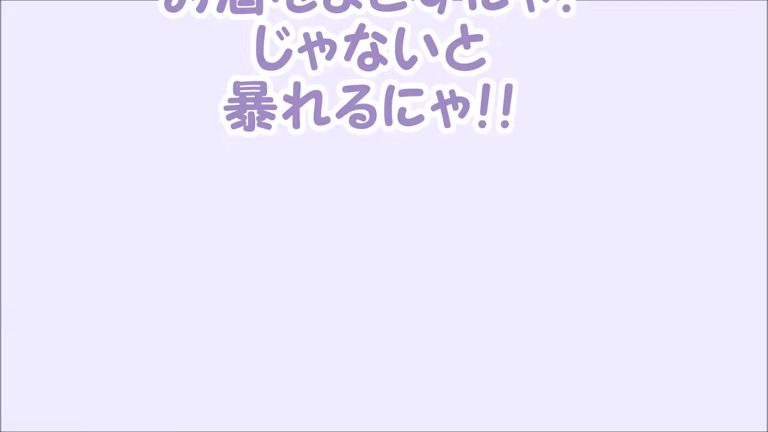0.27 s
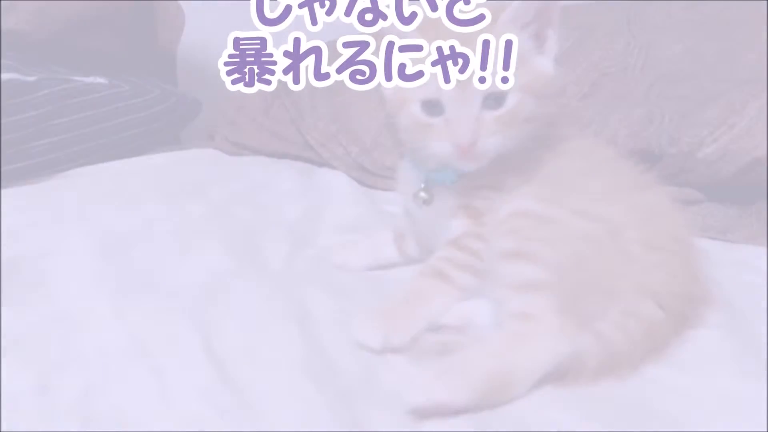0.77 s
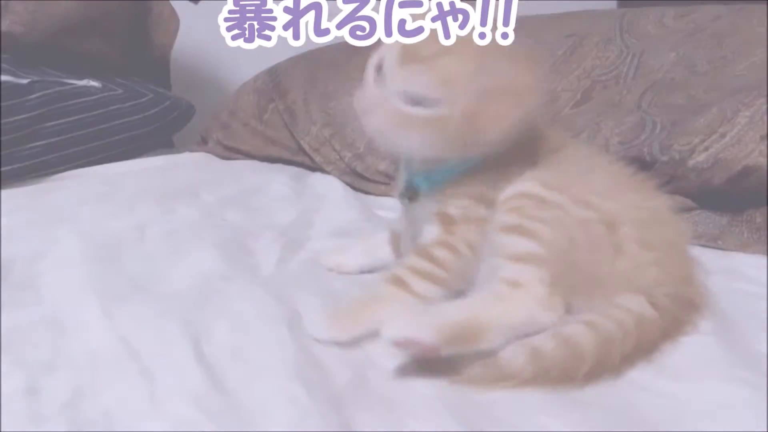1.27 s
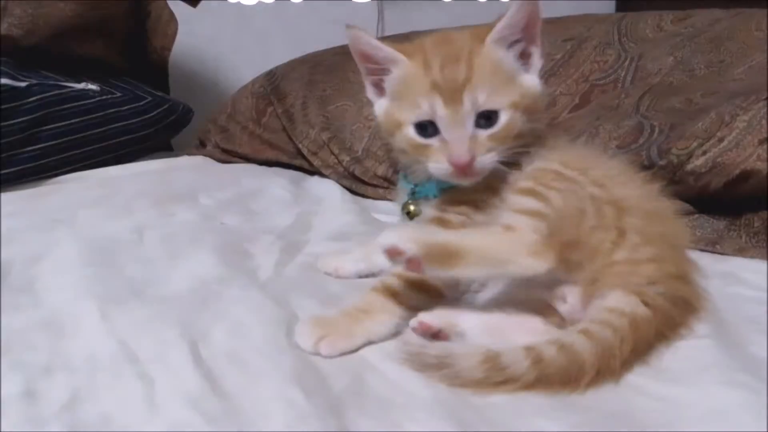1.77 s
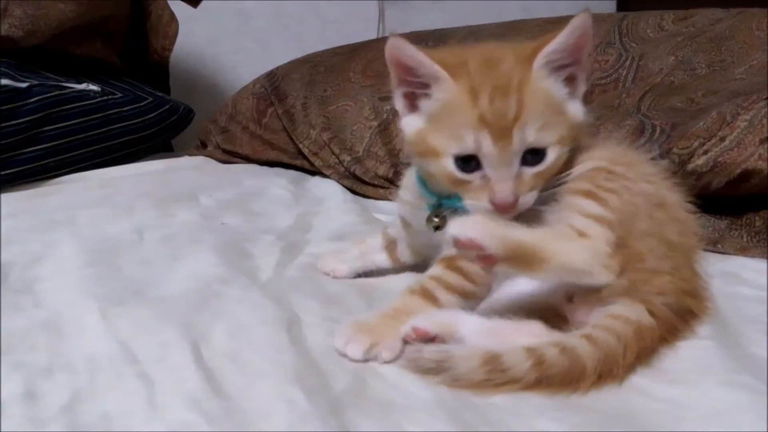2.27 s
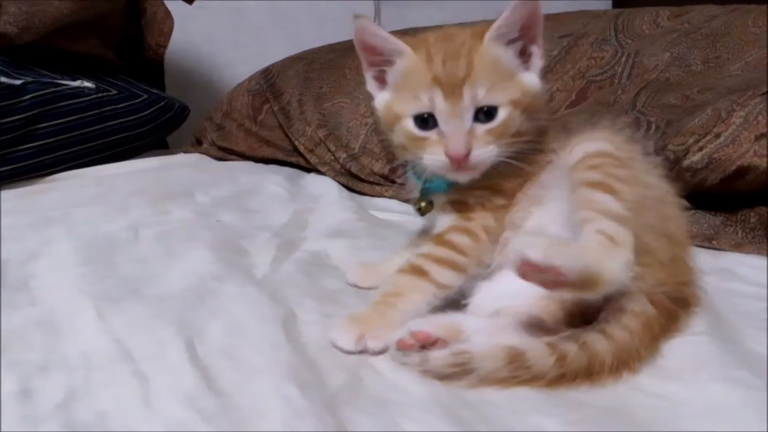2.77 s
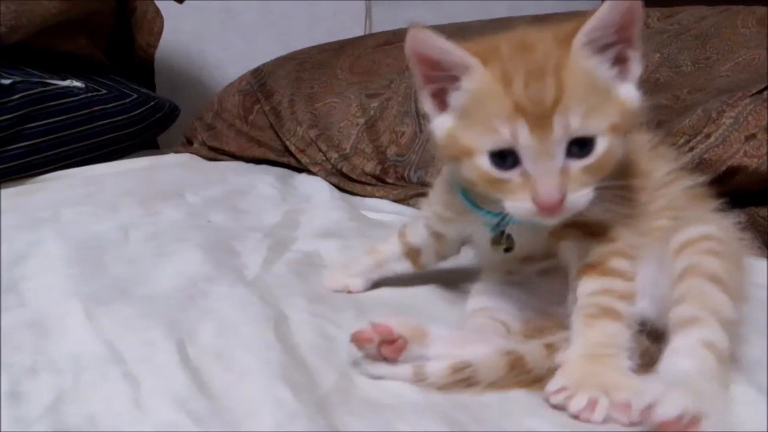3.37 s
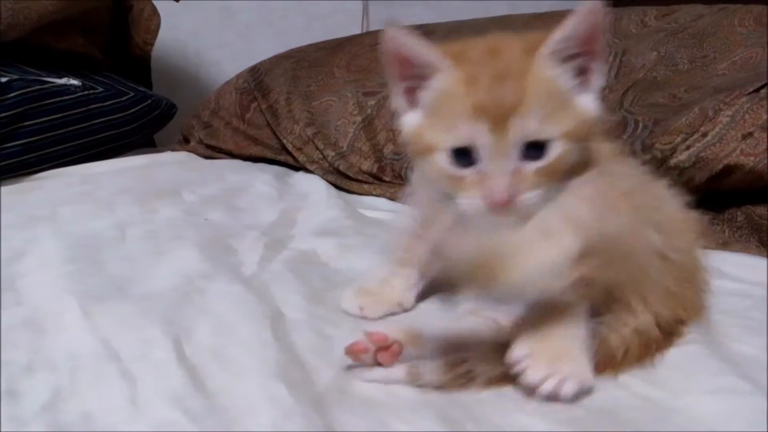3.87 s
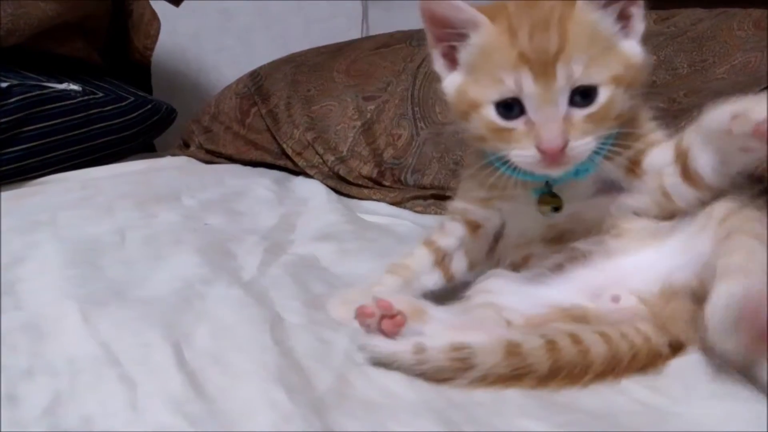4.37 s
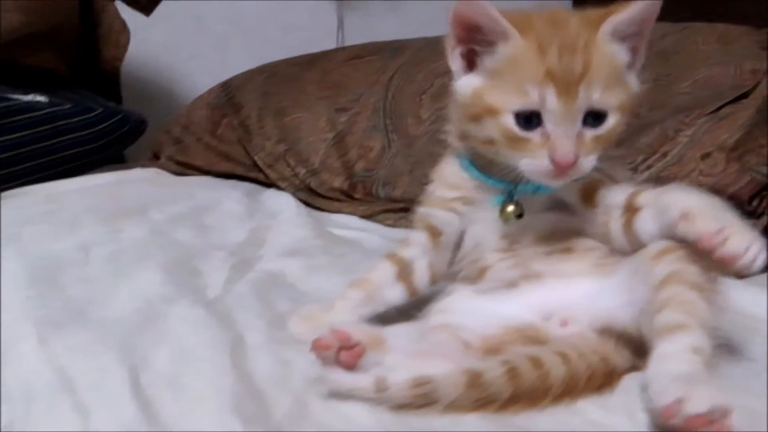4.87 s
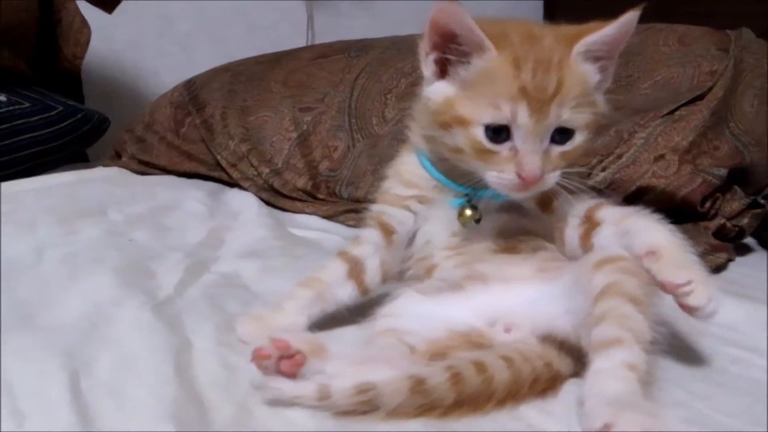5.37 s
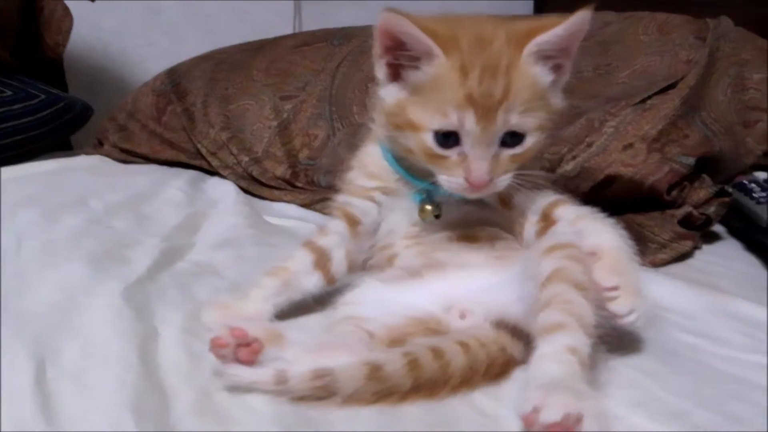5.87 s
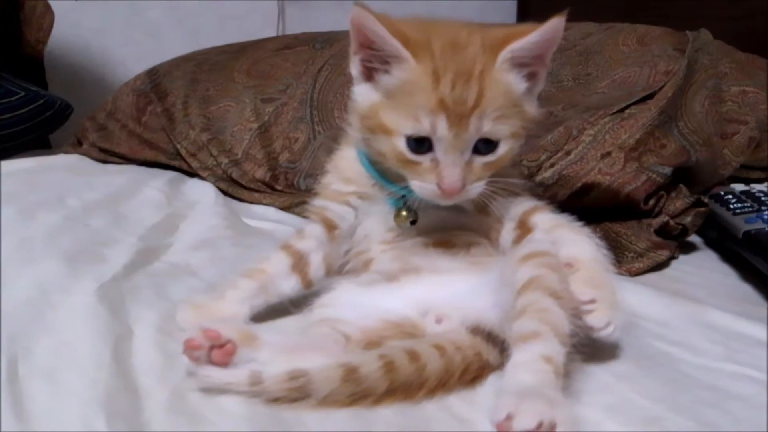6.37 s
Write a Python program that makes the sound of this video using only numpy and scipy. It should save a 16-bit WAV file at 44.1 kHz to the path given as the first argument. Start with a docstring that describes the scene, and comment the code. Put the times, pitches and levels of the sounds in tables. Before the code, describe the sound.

Silence until about 0.46 s, when faint room hiss and low handheld rumble switch on. A kitten stirs on soft bedding close by: thin, high, grainy rustles swell around 0.7, 1.1 and 1.2 s. Its collar bell, damped by fur, ticks dryly at 0.84, most strongly at 1.05, and at 1.16, then rattles in a short, high tinkle fading by 1.7. A sharp knock lands at 0.93; dull soft ones at 1.6 and 1.9. Rustles return near 2.4, 3.2, 3.6 and 4.0, with a thin snap at 2.79 and a double knock at 3.1. Knocks resume at 4.3; a hard crack at 4.51 starts a dense flurry of knocks and clicks until 5.1, including a hollow clack at 4.88. Scattered knocks, faint taps and scratchy brushes follow, strongest around 5.55 and 6.0, with low jolts, another knock at 6.32 and a dull thud at 6.4. Room tail very short.

```python
"""A kitten shifts about on soft bedding in a quiet room, close to the microphone: grainy friction noise
swells with each move, with tiny narrow scrapes in it. Its small collar bell, muffled in fur, gives dry
ticks and one short rattle of decaying sines. Sharp little knocks, brushes and a faint tick, likely from
the hand on the camera, come through its case as resonant pulses and scratchy noise, over rumble and hiss."""
import sys
import numpy as np
from scipy import signal
from scipy.fft import rfft, irfft
from scipy.io import wavfile

SR = 44100
rng = np.random.default_rng(int(sys.argv[2]) if len(sys.argv) > 2 else 0)


def to_wav(s):
    """Save 16-bit WAV."""
    ch = np.atleast_2d(s).T  # columns
    pcm = np.round(np.clip(ch, -1, 1) * 32767)  # PCM
    wavfile.write(sys.argv[1], SR, pcm.astype(np.int16))


N = 292383
TIME = np.arange(N) / SR
PULSE_HZ = np.fft.rfftfreq(8192, 1 / SR) + 1  # raised by 1 Hz to stay clear of zero


def amp(db):
    """Amplitude factor of a level in dB."""
    return 10 ** (np.asarray(db) / 20)


def evened(x):
    """Scales to rms 1."""
    return x / np.sqrt(np.mean(x ** 2) + 1e-20)


def add(mix, s, sound):
    """Mixes a sound in at time s, cut off at the end of the mix."""
    part = mix[round(s * SR):][:len(sound)]
    part += sound[:len(part)]


def coloured(x, colour):
    """Filters x through a curve of (Hz, dB) points, straight on a log frequency axis, to rms 1."""
    hz, db = np.transpose(colour)
    log_hz = np.log(np.fft.rfftfreq(N, 1 / SR) + 1)
    gain = amp(np.interp(log_hz, np.log(hz), db))
    return evened(irfft(rfft(x) * gain, N))


def flutter(rate_hz):
    """Smooth random wavering at rms 1, its spectrum fading out around rate_hz."""
    hz = np.fft.rfftfreq(N, 1 / SR)
    noise = rfft(rng.standard_normal(N))
    return evened(irfft(noise * np.exp(-(hz / rate_hz) ** 2), N))


def friction(grains_per_s, spread_db, smooth):
    """Fibres catch and let go: tiny slips of uneven size over a smooth hiss."""
    size = amp(spread_db * np.minimum(rng.exponential(1, N), 4))
    caught = rng.random(N) < grains_per_s / SR
    slips = size * rng.choice([-1, 1], N) * caught
    return evened(slips) + smooth * rng.standard_normal(N)


def resonances(modes, hz, skirt=1.44):
    """Power passed by a set of resonances, each (Hz, width Hz, dB)."""
    return sum(amp(db) ** 2 / (1 + ((hz - centre ** 2 / hz) / width) ** 2) ** skirt
               for centre, width, db in modes)


def impulse(gain):
    """The sharpest causal pulse that has this spectrum (minimum phase)."""
    both_sides = np.r_[gain, gain[-2:0:-1]]
    log_gain = np.log(np.maximum(both_sides, 1e-5))
    return np.fft.ifft(np.exp(np.conj(signal.hilbert(log_gain)))).real


def click(touches, modes):
    """A single object, touched once or in a quick stutter, sounds the same resonant pulse each time."""
    out = np.zeros(N)
    pulse = impulse(np.sqrt(resonances(modes, PULSE_HZ)))
    for s, db in touches:
        add(out, s, amp(db) * pulse)
    return out


def hiss(level_db=-56):
    """Still air and microphone hiss: steady noise, the quiet of the room."""
    # spectrum of the hiss: f/Hz, level/dB (relative)
    hiss_colour = [(20, -24.5), (160, -3), (300, -3), (550, -8), (1000, -10.5), (2000, -15), (4000, -18.5),
                   (8000, -19.5), (12000, -23), (16000, -24)]
    return amp(level_db) * coloured(rng.standard_normal(N), hiss_colour)


def handling(lift_db=2, sway_cycles=0.645):
    """The low rumble of a hand-held camera, with a short low sway centred on each harder jolt."""
    # spectrum of the rumble: f/Hz, level/dB (relative)
    rumble_colour = [(10, -1), (25, 4.5), (65, -1.5), (110, -6), (200, -10), (400, -18), (1000, -28.5),
                     (3000, -55)]
    # unsteadiness of the hand: t/s, rumble level/dB (before lift_db)
    unsteadiness = [(0.7, -53.5), (0.83, -52), (1.21, -52.5), (2.31, -54), (2.57, -55), (4.17, -54.5),
                    (4.35, -53.5), (4.54, -50), (4.68, -49), (4.97, -50), (5.12, -50), (5.43, -48),
                    (6.24, -51), (6.6, -54)]
    # jolts that sway the camera: t/s, peak level/dB, f/Hz
    jolts = [(4.551, -27.5, 41), (4.778, -38, 30), (5.061, -35, 33), (5.385, -37.5, 36), (5.738, -32.5, 35),
             (6.415, -32, 50.3)]
    level_db = lift_db + np.interp(TIME, *np.transpose(unsteadiness))
    out = coloured(rng.standard_normal(N), rumble_colour) * amp(level_db)
    for s, db, hz in jolts:
        cycles = hz * (TIME - s)
        out += amp(db) * np.cos(2 * np.pi * cycles) * np.exp(-(cycles / sway_cycles) ** 2)
    return out


def movement(fidget_db=-70.5):
    """Strength of the kitten's motion: each move swells and dies away over constant fidgeting."""
    # separate moves of paws and head: t/s (peak), level/dB, half length/s (to 1/e)
    moves = [(.72, -63.5, .1), (1.074, -57.5, 0.028), (1.239, -56, .06), (1.978, -66, .07),
             (2.42, -57.5, 0.06), (2.95, -64.5, .22), (3.224, -59, .07), (3.613, -57, 0.033),
             (3.75, -62.5, .1), (4.016, -62, .08), (4.937, -62, 0.22), (5.48, -59, 0.11)]
    power = sum((amp(db) * np.exp(-((TIME - s) / length) ** 2)) ** 2 for s, db, length in moves)
    return np.sqrt(power + amp(fidget_db) ** 2)


def rustle(level_db=0.0, flutter_db=3.0, flutter_hz=20):
    """Fibre friction makes a thin, grainy, high rustle that flutters as the kitten moves."""
    # spectrum of the rustle: f/Hz, level/dB (relative)
    rustle_colour = [(3000, -38.5), (6000, -16), (6900, -6), (7400, 1.5), (8100, 1), (8900, -7.5),
                     (11000, -29.5), (16000, -28.5)]
    slips = friction(grains_per_s=700, spread_db=3.5, smooth=.5)
    wavering = amp(level_db + flutter_db * flutter(flutter_hz))
    return coloured(slips, rustle_colour) * movement() * wavering


def catches(length_s=0.012, width_hz=700, level_db=-59, low_hz=7600, high_hz=9000, count=10):
    """Tiny scrapes of narrow-band noise within the rustle, likelier the more the kitten moves."""
    out = np.zeros(N)
    effort = np.cumsum(movement() ** 2)
    t = np.arange(-4096, 4096) / SR
    noises = rng.standard_normal((count, len(t)))
    for (when, pitch), noise in zip(rng.random((count, 2)), noises):
        centre = low_hz + (high_hz - low_hz) * pitch
        band = np.sqrt(resonances([(centre, width_hz, 0)], PULSE_HZ))
        scrape = evened(irfft(rfft(noise) * band))
        s = np.interp(when, effort / effort[-1], TIME)
        swell = np.exp(-(t / length_s) ** 2)
        add(out, max(s + t.min(), 0), amp(level_db) * scrape * swell)
    return out


def bell(rise_s=0.000083, upper=1.35, upper_db=-27, roll_spread_db=4):
    """The pellet strikes the shell, then rolls; the firmer the fur presses, the shorter and higher the ring."""
    # the pellet's strikes: t/s, level/dB (before the rise), press of the fur (0 free to 1 firm)
    strikes = [(.8413, -14, 1), (1.0524, -4, 0.8), (1.1585, -14.5, 0.98), (1.203, -38, 0.05),
               (1.212, -30, 0.27), (1.2485, -45, 0), (1.269, -42, .3), (1.335, -42, 0.44),
               (1.378, -56, .36)]
    # the shell hanging free, and pressed into fur
    free_hz, free_t60_s, pressed_hz, pressed_t60_s = 7260, 0.064, 7723, 0.0019
    # after the shake of the head the pellet rolls on and settles
    roll_start_s, roll_length_s, roll_count = 1.19, .5, 90
    roll_db, roll_fade_db_per_s, roll_most_press = -45.5, 40, 0.88
    roll = []
    for when, size, press in rng.random(size=(roll_count, 3)):
        since = roll_length_s * when
        db = roll_db - roll_fade_db_per_s * since + roll_spread_db * (2 * size - 1)
        roll.append((roll_start_s + since, db, roll_most_press * np.sqrt(press)))

    out, t = np.zeros(N), np.arange(SR // 10) / SR
    for s, db, press in strikes + roll:
        hz = free_hz + (pressed_hz - free_hz) * press ** 2
        t60 = free_t60_s * (pressed_t60_s / free_t60_s) ** press
        ring = np.sin(2 * np.pi * hz * t) + amp(upper_db) * np.sin(2 * np.pi * hz * upper * t)
        add(out, s, ring * amp(db - 60 * t / t60) * (1 - np.exp(-t / rise_s)))
    return out


def knocks(notch_depth=0.97, level_db=0.68, low_lag_s=0.00122, chatter_s=0.000211, chatter_share=0.256):
    """Each knock shares its force among the case's resonances by what strikes and where, and chatters once."""
    # knocks on the case: t/s, strength/dB (relative),
    # hardness/dB (0 for a nail, -25 for the pad of a finger),
    # hollowness of the spot/dB (positive on a thin wall, negative on the solid frame)
    blows = [(0.9298, 7.5, 2, 3), (1.596, -4.5, -29, 1), (1.8818, -0.5, -28, -2), (3.0883, 5.5, -6, 5.5),
             (3.1137, 1.5, -18, 2.5), (4.2952, -0.5, -0.5, 6.5), (4.322, -7.5, -21, 4),
             (4.36, -5.5, -26, -2), (4.533, 1, -7, -2), (4.5906, -2.5, -27.5, 2), (4.653, 4, -6, -0.5),
             (4.6673, -2, -1.5, 0), (4.6804, 3, -9.5, -3.5), (4.7185, 1, 2, -1.5), (4.7493, -4, 3.5, 1.5),
             (4.775, -7.5, 3.5, -3), (4.8052, -2.5, 1, -2.5), (4.857, 3.5, 2, -3), (4.8777, -2, .5, -1.5),
             (4.965, 0.5, -5, -1), (5.0138, 0.5, 0.5, 0.5), (5.0402, 0.5, -3.5, 0.5),
             (5.062, -2, -18.5, -5.5), (5.3063, 3, -4.5, -3.5), (5.3654, -1, -8.5, -6.5),
             (5.396, -0.5, -21, -7.5), (5.415, -4, -21.5, -7.5), (5.7353, -4, 5.5, 3), (5.7482, -5, -3, -3),
             (5.8636, -16, 4, 8), (5.902, -3, 4.5, 4.5), (6.3164, 2.5, -2, -2), (6.397, -6, 6.5, -3)]
    # what the case rings with, from dull thump to bright tick: f/Hz, width/Hz, level/dB (relative)
    thump = [(65, 61, 0)]
    body = [(161, 149, -1.37), (507, 184, -2.3)]
    middle = [(1050, 237, 0.5), (1360, 623, -3.5)]
    clack = [(4660, 2000, -4), (6003, 1100, 4.5)]
    tick = [(7870, 1240, 2), (9135, 1200, -4), (12900, 3241, -38)]
    # how those five groups share a blow: level/dB, dB per dB of hardness, dB per dB of hollowness
    shares = [(10, 0.44, -0.4), (-.5, 0.2, -0.06), (-10.5, 0.06, 1), (-12.5, 0.8, 0.5), (-5, 1, 0)]
    # where neighbouring resonances cancel: f/Hz, width/Hz
    notches = [(720, 63), (2350, 280), (6950, 230)]
    # faint fingertip taps while the grip shifts: from and to (s); strength, hardness, hollowness (dB)
    grip_s, tap_db, tap_hardness_db, tap_hollow_db = (5.7, 6.4), -8, -27, 2.5
    taps = [(s, tap_db, tap_hardness_db, tap_hollow_db) for s in rng.uniform(*grip_s, size=5)]
    blows = blows + taps

    out, hz = np.zeros(N), PULSE_HZ
    groups = [resonances(modes, hz) for modes in (thump, body, middle, clack, tick)]
    dips = np.prod([1 - min(notch_depth, 1) / (1 + ((hz - centre) / width) ** 2)
                    for centre, width in notches], axis=0)
    # bending waves in the case: the low notes arrive after the high ones
    lag = low_lag_s / np.sqrt(1 + hz / 1000)
    travel = np.exp(-2j * np.pi * np.cumsum((lag - lag.min()) * np.gradient(hz)))
    delays = chatter_s * rng.uniform(0.51, 1.93, len(blows))
    for (s, strength_db, hard_db, hollow_db), delay in zip(blows, delays):
        shares_db = [strength_db + db + by_hard * hard_db + by_hollow * hollow_db
                     for db, by_hard, by_hollow in shares]
        power = sum(amp(db) ** 2 * group for db, group in zip(shares_db, groups))
        pulse = impulse(np.sqrt(dips * power))
        chatter = 1 + chatter_share * np.exp(-2j * np.pi * hz * delay)
        add(out, s, irfft(rfft(pulse) * travel * chatter))
    return amp(level_db) * out


def snap():
    """A small hard thing gives a thin snap: one resonant pulse in a quick stutter."""
    # touches: t/s, level/dB (relative)
    touches = [(2.785, -13), (2.78528, -1), (2.7858, -15.5)]
    # resonances: f/Hz, width/Hz, level/dB (relative)
    modes = [(60, 50, 5), (1590, 3400, -4), (3840, 500, 5), (4870, 1000, -5), (7160, 1020, 8.5),
             (8700, 820, -5), (12350, 2650, -7.5)]
    return click(touches, modes)


def brushes_and_tick(level_db=0, scratch_db=1.5, scratch_hz=150, rise_per_fall=0.6):
    """Short brushes and one faint tick of friction noise, slightly scratchy from fast level flutter."""
    # a faint tick (first row), then brushes: t/s (peak), level/dB (before the scratchiness), fall/s (to 1/e)
    touches = [(3.005, -48, 0.0022), (4.614, -46, .016), (5.073, -48.5, 0.0384), (5.255, -55, .025),
               (5.41, -53, .08), (5.552, -45.5, .036), (5.62, -50.5, 0.051), (5.78, -55, 0.098),
               (5.855, -51.5, 0.02), (6.013, -43.5, 0.024), (6.1, -58, 0.059), (6.27, -53.5, .028),
               (6.432, -48, .014), (6.471, -46, 0.02)]
    # spectrum of the brushes and the tick: f/Hz, level/dB (relative)
    brush_colour = [(300, -15), (1500, -9), (3000, -7), (4600, -4.5), (6700, -1.5), (7800, 1), (8700, -5.5),
                    (10500, -11), (16000, -39)]
    power = np.zeros(N)
    for s, db, fall in touches:
        distance = np.maximum((s - TIME) / (rise_per_fall * fall), (TIME - s) / fall)
        power += (amp(level_db + db) * np.exp(-distance)) ** 2
    slips = friction(grains_per_s=2000, spread_db=3.5, smooth=.7)
    scratch = amp(scratch_db * flutter(scratch_hz))
    return np.sqrt(power) * scratch * coloured(slips, brush_colour)


def crack():
    """The one hard crack on the case: a resonant pulse and its weaker repeat."""
    # touches: t/s, level/dB (relative)
    touches = [(4.51, 1), (4.51039, -13.5)]
    # resonances: f/Hz, width/Hz, level/dB (relative)
    modes = [(65, 67, 16.5), (204, 120, 14.5), (353, 80, 8.5), (607, 85, -5), (1260, 270, 9),
             (2110, 910, -4), (4460, 850, 5.5), (5760, 1240, 6), (7830, 710, 13.5), (9060, 1800, 9.5),
             (13000, 3200, -17.5)]
    return click(touches, modes)


def hollow_clack():
    """Another small hard thing gives a hollow clack: low and middle resonances in a stutter."""
    # touches: t/s, level/dB (relative)
    touches = [(4.8811, 1.5), (4.8829, -15.5), (4.8862, -11)]
    # resonances: f/Hz, width/Hz, level/dB (relative)
    modes = [(70, 79, 5), (322, 160, 2.5), (900, 130, 8), (1027, 77, 7.5), (1490, 360, -2), (1850, 190, 5),
             (2800, 690, 2.5), (3870, 1500, 1.5), (5400, 980, -9.5), (7180, 1000, -4)]
    return click(touches, modes)


def thud():
    """A fingertip's dull thud: one pulse weighted to the low resonances."""
    # touches: t/s, level/dB (relative)
    touches = [(6.3963, 0)]
    # resonances: f/Hz, width/Hz, level/dB (relative)
    modes = [(158, 140, 22.5), (503, 170, 10.5), (666, 210, 9), (955, 220, 8.5), (1360, 195, 3.5),
             (3560, 2400, -5)]
    return click(touches, modes)


def room(x, level_db=-25, t60_s=0.092):
    """The soft furnishings return only a faint, short tail of decaying noise."""
    t = np.arange(SR // 4) / SR
    tail = rng.standard_normal(len(t)) * amp(-60 * t / t60_s)
    return amp(level_db) * signal.oaconvolve(x, tail / np.linalg.norm(tail))[:N]


def scene():
    """Everything is close and nearly dry; only the bell, knocks and clicks raise the room."""
    hits = bell() + knocks() + snap() + crack() + hollow_clack() + thud()
    background = hiss() + handling()
    bedding = rustle() + catches()
    return (background + bedding + hits + room(hits) + brushes_and_tick())[None]


def record(dry, start_s=.46, open_s=.008, edge_hz=16100):
    """Silence until the sound is switched on; then the band limit."""
    opened = dry * np.clip((TIME - start_s) / open_s, 0, 1)
    lowpass = signal.firwin(255, edge_hz, window=("kaiser", 8), fs=SR)
    return signal.oaconvolve(opened, lowpass[None], "same")


dry = scene()
out = record(dry)
to_wav(out)
```